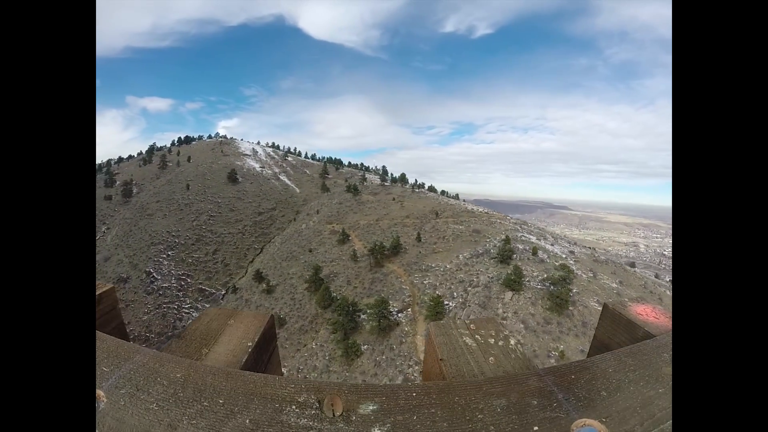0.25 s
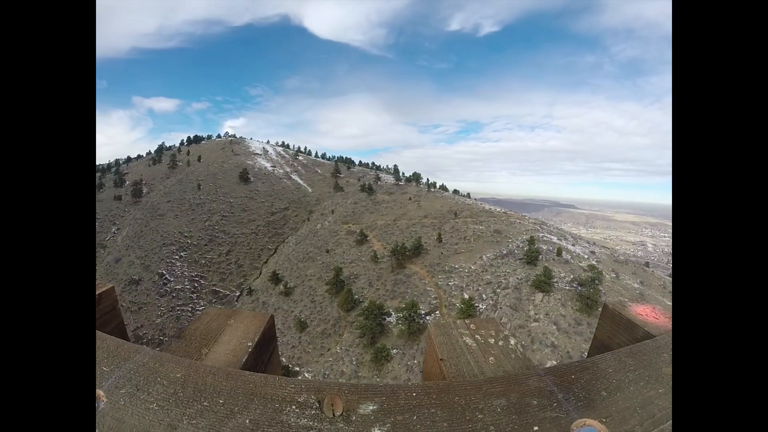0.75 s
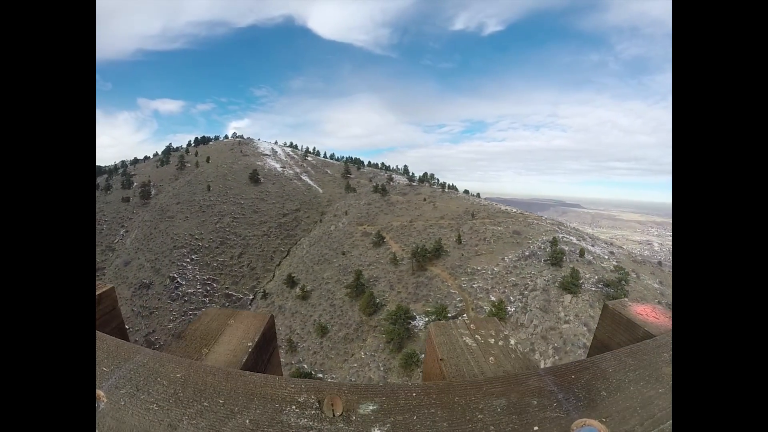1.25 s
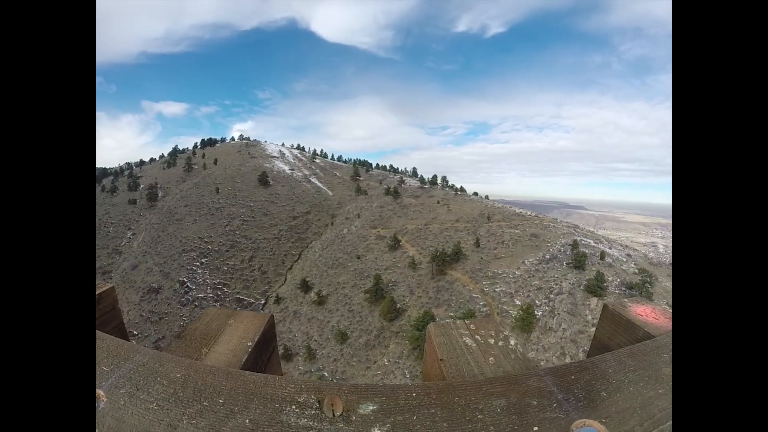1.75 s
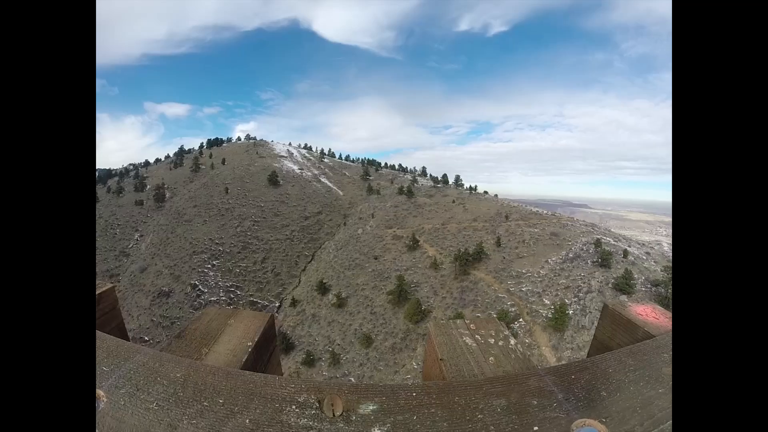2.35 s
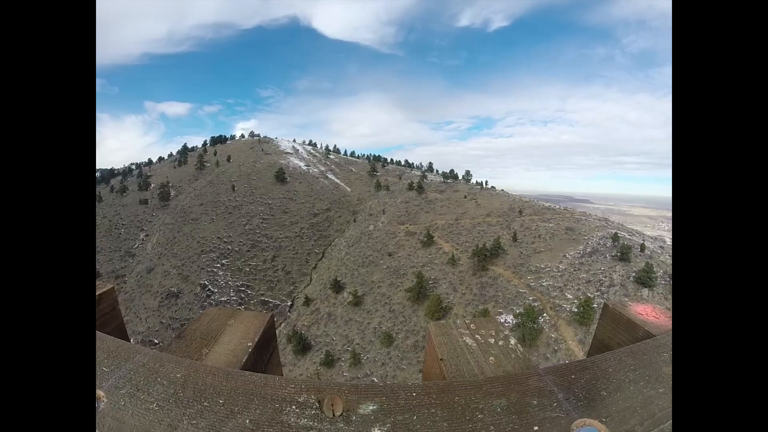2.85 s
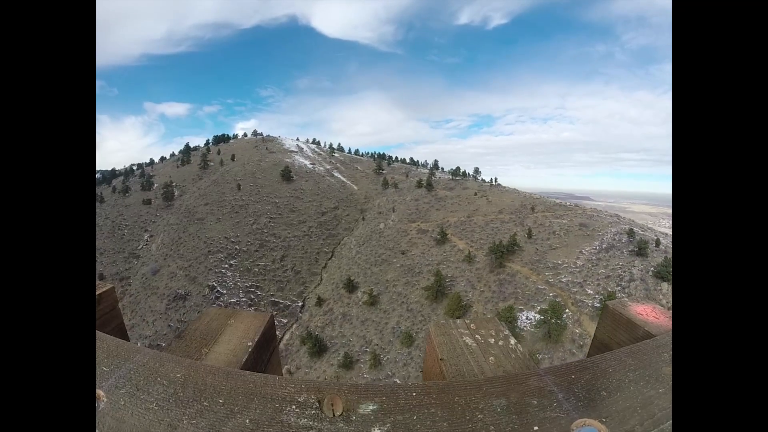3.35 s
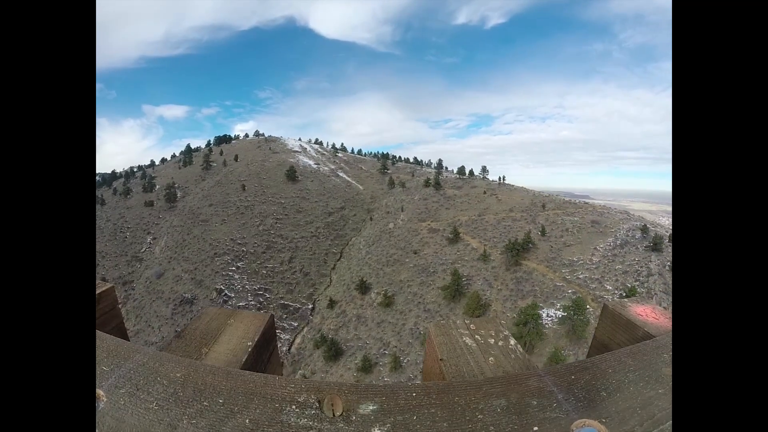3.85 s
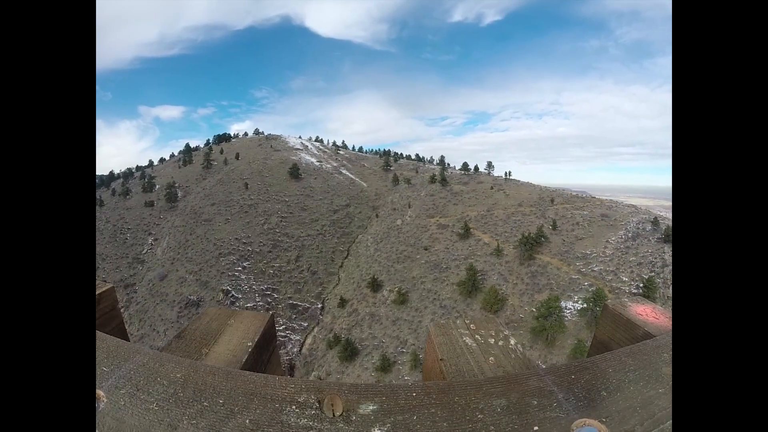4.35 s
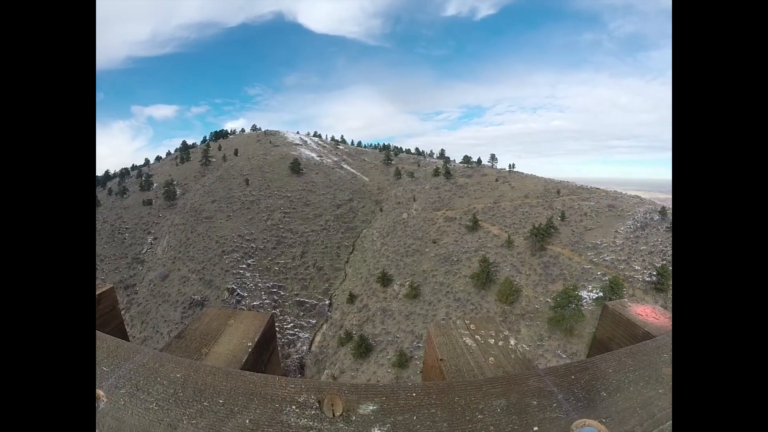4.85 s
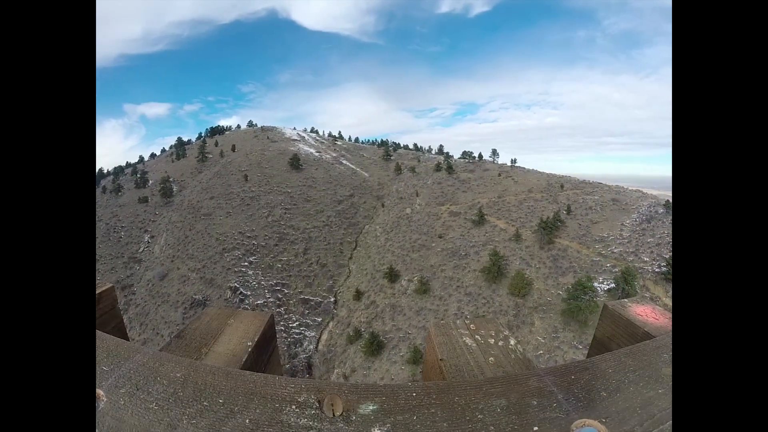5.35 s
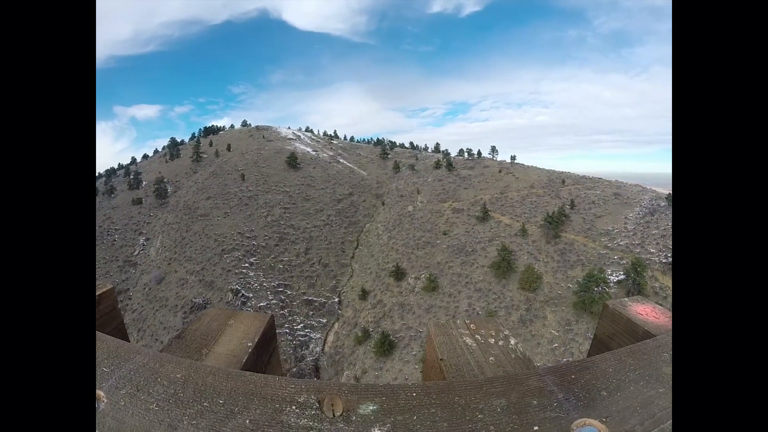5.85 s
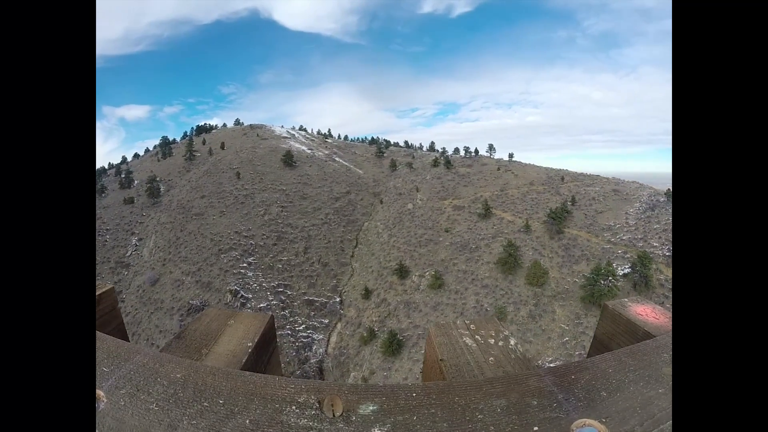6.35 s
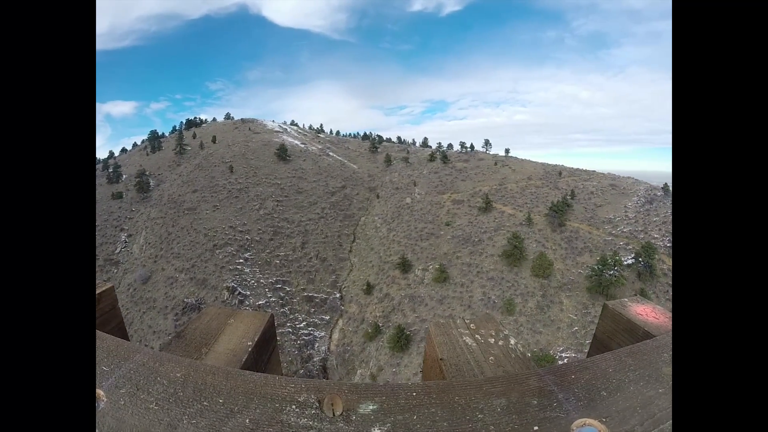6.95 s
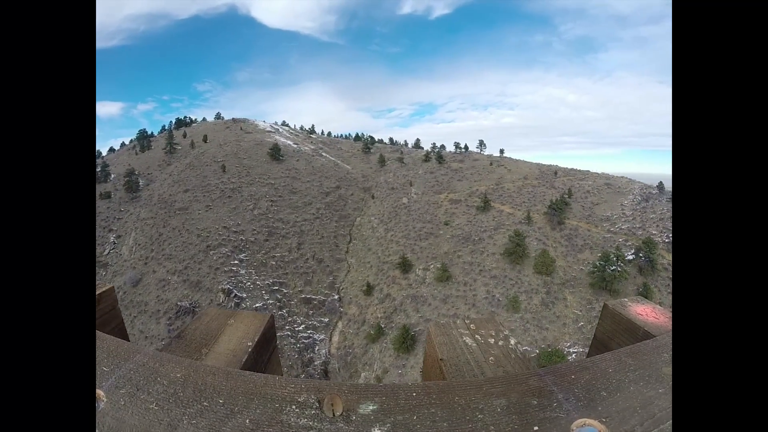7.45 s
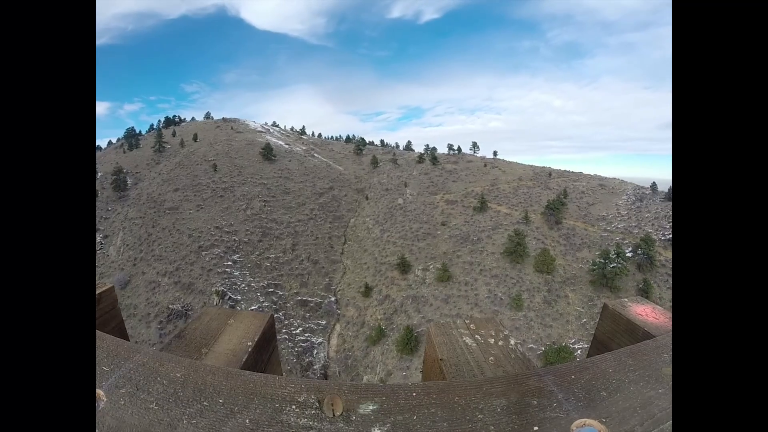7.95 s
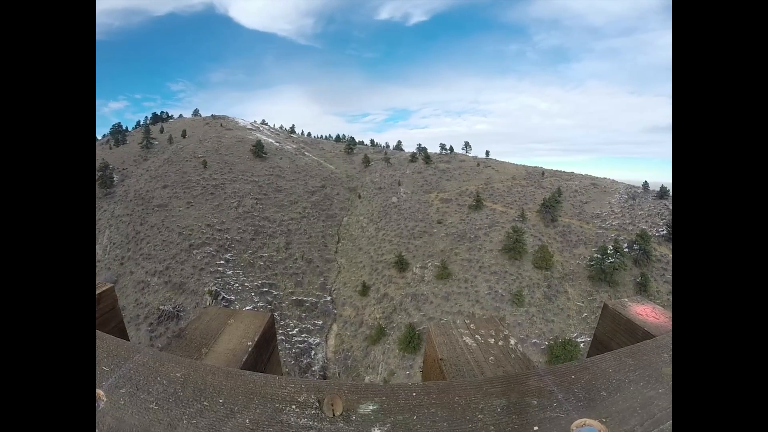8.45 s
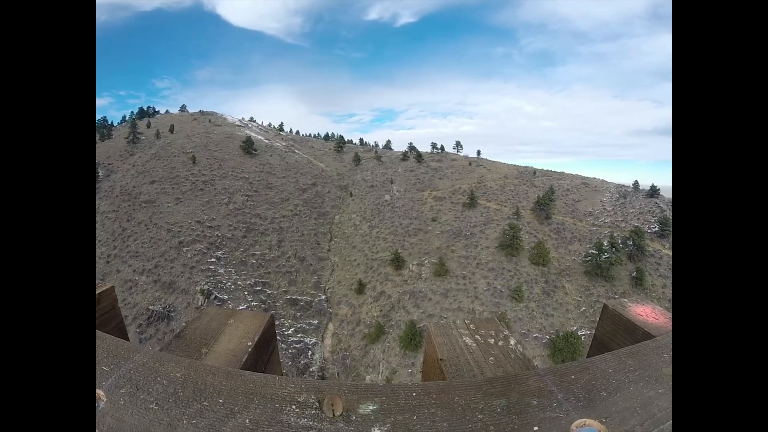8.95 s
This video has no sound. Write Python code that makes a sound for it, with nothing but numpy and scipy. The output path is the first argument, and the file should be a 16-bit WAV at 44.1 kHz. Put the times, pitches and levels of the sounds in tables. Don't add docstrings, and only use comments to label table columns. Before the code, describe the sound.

From right under a flying helicopter: rapid airy chopping, ringing hiss, deep wind rumble, and bursts of hard clattering that later thin to ticks.

```python
import sys
import numpy as np
from scipy import signal
from scipy.fft import rfft, irfft, next_fast_len
from scipy.io import wavfile
from scipy.ndimage import uniform_filter1d

SR = 44100
rng = np.random.default_rng(int(sys.argv[2]) if len(sys.argv) > 2 else 0)


def invert_db(x):
    u = np.asarray(x, float) / 20
    return 10 ** u


def dump(signal):
    limited = np.clip(np.atleast_2d(signal).T, -1, 1)
    pcm = np.round(limited * 32767).astype(np.int16)
    wavfile.write(sys.argv[1], SR, pcm)


N = 406161

BLADE_PASS_HZ = 10.75
# time_s, blade_lead_turns, puff_db, hiss_db
ROTOR = [(0, -0.33, -37, -34.5), (.6, -0.41, -36.5, -34.5), (1.1, -0.31, -33.5, -34.5),
         (1.6, -0.29, -35.5, -35.5), (2.6, -0.3, -33, -36.5), (3.6, -0.22, -34, -35),
         (4.1, -0.26, -35, -37), (4.6, -0.24, -38.5, -34.5), (5.1, -0.24, -34, -36),
         (5.6, -0.44, -32.5, -37.5), (6.6, -0.46, -36, -35.5), (7.1, -0.47, -34.5, -36.5),
         (7.6, -0.34, -31.5, -36.5), (8.1, -0.52, -34, -37.5), (8.6, -0.49, -35, -35.5),
         (9.21, -0.5, -32.5, -36.5)]
# start_s, peak_db
SLAPS = [(0.141, -20), (0.199, -20), (2.54, -22), (3.913, -17), (4.442, -19), (4.486, -29), (4.563, -17),
         (4.642, -19), (4.842, -25), (4.91, -25), (5.016, -28), (5.407, -22), (5.503, -16), (5.686, -14.5),
         (6.049, -15.5), (6.157, -23), (7.368, -21.5), (7.823, -20.5), (7.854, -44.5), (7.93, -22),
         (8.115, -15), (8.208, -18.5), (8.3, -17), (8.704, -17.5), (8.77, -16.5)]
# centre_hz, width_hz, level_db
CASE_RESONANCES = [(202.4, 46, 1), (322, 480, -9.5), (475, 26, -11), (786, 180, -6), (1062, 120, -13),
                   (1570, 117, 1), (2152, 175, -1), (2754, 220, -9.5), (3360, 220, -26.5),
                   (3400, 430, -20.5), (4283, 175, -17.5), (4950, 260, -21), (5600, 400, -25.5),
                   (6190, 470, -26.5), (6910, 120, -23.5), (7450, 190, -26), (8170, 170, -25.5),
                   (8865, 135, -23), (9700, 230, -28), (10350, 170, -26.5), (11380, 500, -36),
                   (12700, 640, -39.5), (15300, 1400, -37)]
# time_s, level_db
LOW_COUPLING = [
    (0, 3),
    (1.5, -3.5),
    (3, -5),
    (4, 0.5),
    (5, 1),
    (6.5, 4.5),
    (7.5, 2),
    (8.5, 3.5),
    (9.21, 1.5),
]
# pitch_hz, level_db (relative)
WHINE = [
    (3163, -64),
    (4357, -71),
    (1072, -65),
]


def rotor_and_turbine():
    lead, puff_db, hiss_db = in_time(ROTOR)
    turn = (BLADE_PASS_HZ * np.arange(N) / SR + lead + 0.014 * drift(1.7) + 0.23) % 1
    gate = np.clip(turn / 0.13, 0, 1) * np.exp(-(turn / 0.55) ** 5)
    eddies = invert_db(5.8 * np.tanh(0.8 * drift(110)))
    eddies = eddies / np.sqrt(uniform_filter1d(eddies ** 2, size=SR // 20))

    start_s, peak_db = np.transpose(SLAPS)
    slaps = bursts(start_s, peak_db - 4.5, np.full(len(start_s), 0.004), rise_s=0.00095)
    air = rng.standard_normal(N) + 0.3 * grains(900, spread_db=2.5)
    puffs = (invert_db(puff_db + 2.5) * gate * eddies + slaps) * air
    cracks = np.round((start_s + 0.001) * SR).astype(int)
    puffs[cracks] += invert_db(peak_db + 11.0)

    hiss = invert_db(2.3 * np.tanh(drift(69))) * rng.standard_normal(N)
    hiss = signal.sosfilt(signal.butter(1, 300, "high", fs=SR, output="sos"), hiss)

    dull = signal.butter(2, 3500, fs=SR, output="sos")
    scale = np.std(through(signal.sosfilt(dull, air), CASE_RESONANCES))
    drive = signal.sosfilt(dull, puffs) + invert_db(hiss_db + 1.0) * hiss
    deep = signal.sosfilt(signal.butter(1, 420, fs=SR, output="sos"), drive)
    low_coupling = invert_db(in_time(LOW_COUPLING)[0])
    sound = through(drive + (low_coupling - 1) * deep, CASE_RESONANCES) / scale

    for pitch_hz, level_db in WHINE:
        strength = invert_db(level_db + 6.0 + 3.4 * drift(7.2))
        phase = 2 * np.pi * np.cumsum(pitch_hz + 2.59 * drift(6.1)) / SR
        sound = sound + strength * np.sin(phase)
    return sound


# centre_hz, width_hz, level_db
LOOSE_PART = [(1470, 110, -3), (2306, 380, 2), (2454, 444, 1.5), (3626, 200, -9.5), (4400, 380, -17),
              (5330, 167, -10), (5790, 245, -9), (6350, 460, -12.5), (7200, 430, -23), (8800, 990, -28),
              (12600, 900, -41)]


def rattle():
    start_s, peak_db, length_s, dull_db = contacts()
    chatter = chatter_level() * invert_db(4.5 + 7.0 * np.tanh(drift(96)))
    thuds = evened(grains(9000, spread_db=3.5), span_s=0.012)
    ticks = evened(grains(900, spread_db=2.5) + 0.6 * thuds, span_s=0.012)
    scale = np.std(through(thuds, LOOSE_PART))

    dull_knocks = bursts(start_s, peak_db + dull_db + 3.0, length_s * 0.65, rise_s=0.0061)
    bright_knocks = bursts(start_s + 0.004, peak_db - 1.0, length_s * 0.4, rise_s=0.002)
    dull = (dull_knocks + chatter) * thuds
    bright = (invert_db(5.5) * bright_knocks + chatter) * ticks
    low_and_top = LOOSE_PART[:5] + LOOSE_PART[9:]
    return (through(dull, low_and_top) + through(bright, LOOSE_PART[5:9])) / scale


# start_s, peak_db, bounces (rounded; below -0.5 the knock is silent), dull_share_db
KNOCKS = [(4.313, -19, 0.5, -2), (4.365, -29, 1.5, 2.5), (4.48, -15.5, 1, 3), (4.533, -27, 1.5, -8),
          (4.59, -12, 0.5, -2), (4.638, -16, 2, 4), (4.735, -13, 2, -5), (4.841, -13, -1, 7.5),
          (4.912, -18, 1.5, -1), (5.013, -16.5, 0.5, -0.5), (5.097, -24, 2, 2), (5.439, -24.5, 0, 8),
          (5.474, -19, 3, -4), (5.608, -19.5, 1, 4), (5.682, -18, 0.5, -7), (5.731, -17.5, 2, -8),
          (5.825, -14.5, 1, -2), (5.87, -13.5, 1.5, -9), (5.932, -15, 0.5, -8.5), (5.9813, -15, 0.5, -3),
          (6.0614, -6, -1.5, -2), (6.111, -18, 0.5, 7), (6.2197, -40, 3, 8.5), (6.549, -24, 1.5, -2.5),
          (6.6253, -27, 1.5, 5), (6.701, -19, 1.5, -1.5), (6.77, -15, -1, -7), (6.812, -19.5, 2, 0),
          (6.933, -16.5, -0.5, 6), (6.982, -24, 0.5, 0)]
# start_s, peak_db
TICKS = [(2.507, -23.5), (2.681, -35), (3.59, -30), (3.96, -32), (4.182, -28), (6.145, -29), (6.437, -26),
         (7.086, -29), (7.204, -29), (7.225, -18), (7.2803, -24), (7.344, -27), (7.4674, -39), (7.832, -34),
         (8.7714, -38), (8.868, -26), (8.935, -28), (9.104, -29), (9.174, -33)]
TICK_DULL_DB, BOUNCE_S = 2, 0.0292
KNOCK_S, HARD_SHORTENS = 0.011, 0.19


def contacts():
    rows = []
    for start_s, peak_db, bounces, dull_db in KNOCKS:
        luck_s = 0.0019 * rng.standard_normal()
        for k in range(round(bounces) + 1):
            rows.append((start_s + k * BOUNCE_S + luck_s * (k > 0), peak_db, dull_db))
    for start_s, peak_db in TICKS:
        rows.append((start_s, peak_db, TICK_DULL_DB))
    start_s, peak_db, dull_db = np.transpose(rows)
    return start_s, peak_db, KNOCK_S * invert_db(-HARD_SHORTENS * (peak_db + 21)), dull_db


# start_s, length_s, level_db
SPELLS = [(0, 4.2, -55.5), (4.327, 0.047, -49), (4.48, .05, -50), (4.63, 0.05, -45.5), (4.731, .22, -37.5),
          (5.006, 0.041, -37.5), (5.086, 0.058, -39), (5.193, 0.049, -47), (5.478, 0.098, -38.5),
          (5.693, 0.058, -36.5), (5.833, 0.14, -40), (6.046, 0.02, -35.5), (6.154, 0.16, -39.5),
          (6.359, 0.02, -36), (6.435, 0.17, -54), (6.74, 0.277, -42), (7.095, .24, -45.5),
          (7.459, 0.16, -46.5), (8.781, 0.16, -45), (8.973, 0.18, -52)]
CHATTER_REST_DB, SPELL_ATTACK_S, SPELL_RELEASE_S = -62, 0.02, 0.048


def chatter_level():
    t = np.arange(N) / SR
    spells = np.zeros(N)
    for start_s, length_s, level_db in SPELLS:
        end_s = start_s + length_s
        corners_s = [start_s - SPELL_ATTACK_S, start_s, end_s, end_s + SPELL_RELEASE_S]
        spells += invert_db(level_db) * np.interp(t, corners_s, [0, 1, 1, 0])
    return invert_db(CHATTER_REST_DB) + spells * invert_db(1.1 * np.tanh(drift(36)))


LOW_MODE_HZ, MIDDLE_MODE_HZ, UPPER_MODE_HZ = 110.5, 143.7, 177.9
LOW_REST_DB, MIDDLE_REST_DB, UPPER_REST_DB = -42.5, -39.5, -42
LOCK_DB, LOCK_ENDS_S, LOCK_FADE_DB_PER_S = -28, 1.199, 19
# time_s, half_length_s, low_mode_db, middle_mode_db
BUFFETS = [(0, 0.054, -30, -27.5), (.3, 0.22, -31.5, -30.5), (1.384, 0.078, -41, -24),
           (1.565, 0.15, -30, -29), (1.813, 0.077, -46, -21), (2.013, 0.086, -31.5, -41),
           (2.362, 0.052, -31, -32), (2.683, 0.093, -35, -29.5), (3.003, 0.095, -33, -27.5),
           (3.21, 0.031, -24.5, -25.5), (3.356, 0.033, -24, -25), (3.56, .06, -29.5, -29.5),
           (3.894, 0.057, -26, -26.5), (4.16, 0.1, -45, -29.5), (4.285, 0.019, -17, -33),
           (4.395, 0.032, -35, -26), (4.51, 0.045, -22.5, -23), (4.638, 0.12, -29, -21),
           (4.814, 0.037, -20, -23.5), (4.992, .09, -35, -20.5), (5.26, 0.068, -44, -21),
           (5.61, 0.14, -32, -26.5), (5.716, 0.024, -27.5, -32), (5.875, 0.046, -26, -21),
           (6.054, 0.049, -28, -28), (6.28, 0.039, -23, -28.5), (6.447, 0.088, -30, -26.5),
           (6.724, 0.081, -32, -32), (8.408, 0.028, -43, -27), (9.004, 0.029, -34, -40)]
# time_s, half_length_s, level_db
UPPER_BUFFETS = [(1.837, 0.074, -33), (2.07, 0.074, -33.5), (2.466, 0.057, -34.5), (3.492, 0.019, -35),
                 (3.85, .04, -36.5), (4.227, 0.047, -30.5), (4.368, 0.034, -29), (4.52, 0.05, -33),
                 (4.859, .18, -30), (5.387, 0.124, -30.5), (5.72, 0.048, -32), (6.272, 0.033, -28.5),
                 (6.721, 0.046, -33.5), (6.92, 0.049, -31.5), (7.44, 0.16, -35), (8.28, .1, -37),
                 (9.005, 0.047, -35.5)]


def mount():
    time_s, half_s, low_peak_db, middle_peak_db = np.transpose(BUFFETS)
    low_db = shaken_db(LOW_REST_DB, time_s, half_s, low_peak_db)
    middle_db = shaken_db(MIDDLE_REST_DB, time_s, half_s, middle_peak_db)
    lock_db = LOCK_DB - LOCK_FADE_DB_PER_S * np.maximum(np.arange(N) / SR - LOCK_ENDS_S, 0)
    upper_db = np.maximum(lock_db, shaken_db(UPPER_REST_DB, *np.transpose(UPPER_BUFFETS)))
    unlocked = np.clip(uniform_filter1d(-30 - upper_db, size=SR // 2) / 8, 0, 1)

    low = shaken_mode(LOW_MODE_HZ, low_db - 2.5, wander_hz=7.0, flutter_db=2.51)
    middle = shaken_mode(MIDDLE_MODE_HZ, middle_db - 0.6, wander_hz=4.5, flutter_db=1.78)
    upper = shaken_mode(UPPER_MODE_HZ, upper_db - 0.6, wander_hz=2 + 10 * unlocked, flutter_db=2.0)
    overtone = rms_one(through(rng.standard_normal(N), [(510, 30, 0)]))
    return low + middle + upper + (1 - unlocked) * invert_db(upper_db - 19.5) * overtone


def shaken_db(rest_db, times_s, halves_s, peaks_db):
    t = np.arange(0, N, 40) / SR
    swells = np.zeros(len(t))
    for time_s, half_s, peak_db in zip(times_s, halves_s, peaks_db):
        swells += invert_db(2 * peak_db) * np.exp(-((t - time_s) / half_s) ** 2)
    rest = invert_db(2 * (rest_db + 0.56 * gust_swing()))
    return 10 * np.log10(rest + np.interp(np.arange(N) / SR, t, swells))


def shaken_mode(hz, level_db, wander_hz, flutter_db):
    phase = 2 * np.pi * np.cumsum(hz + wander_hz * drift(11.49)) / SR
    return np.sqrt(2) * invert_db(level_db + flutter_db * drift(22.3)) * np.sin(phase)


SWAY_DB, SWAY_FOLLOWS, RUMBLE_DB, RUMBLE_FOLLOWS = -34, 1.23, -32, 0.9
# frequency_hz, level_db (per Hz)
RUMBLE = [
    (15, -17),
    (25, -13),
    (65, -3),
    (145, -4.5),
    (165, -4),
    (264, -21),
    (320, -24),
    (420, -53.5),
    (700, -120),
]
# time_s, strength_db, roughness_db
GUST = [(0, -38, -2), (1.0, -36.5, 0), (1.4, -37.5, 4.5), (2.0, -33, -1.5), (2.5, -33.5, 0.5),
        (2.8, -35, 0.5), (3.2, -32.5, -0.5), (3.85, -30.5, 1.5), (4.3, -28.5, -1), (5.1, -29, 1),
        (5.25, -35.5, 0.5), (5.8, -29.5, 1), (6.45, -29, -2.5), (7.1, -31, -1), (7.55, -34, 0),
        (8.3, -39, -0.5), (8.85, -36, 1), (9.21, -34, 2)]


def wind():
    sway_db = SWAY_DB + SWAY_FOLLOWS * gust_swing()
    rumble_db = RUMBLE_DB + RUMBLE_FOLLOWS * gust_swing()
    sway = shaken_mode(19, sway_db - 0.7, wander_hz=4.04, flutter_db=2.5)
    hz, db = np.transpose(RUMBLE)
    lumps = invert_db(0.37 * drift(14)) * rng.standard_normal(N)
    rumble = causal_filter(lumps, lambda at: invert_db(np.interp(np.log(at), np.log(hz), db)))
    roughness_db = in_time(GUST)[1]
    return sway + invert_db(rumble_db + roughness_db) * rms_one(rumble)


def gust_swing():
    gust_db = in_time(GUST)[0]
    return gust_db - gust_db.mean()


def bursts(times_s, peaks_db, lengths_s, rise_s):
    out, t = np.zeros(N), np.arange(SR // 8) / SR
    for start_s, peak_db, length_s in zip(times_s, peaks_db, lengths_s):
        i = round(start_s * SR)
        shape = np.exp(-t / max(length_s, 0.002)) * (1 - np.exp(-t / rise_s)) ** 2
        out[i:i + len(t)] += (invert_db(peak_db) * shape)[:N - i]
    return out


def grains(per_s, spread_db):
    sizes = invert_db(spread_db * np.minimum(rng.exponential(1, N), 5)) * rng.choice([-1, 1], N)
    return rms_one(sizes * (rng.random(N) < per_s / SR))


def evened(x, span_s):
    return x / np.sqrt(uniform_filter1d(x ** 2, size=int(span_s * SR)) + 0.05)


def through(x, body):
    def gain_at(hz):
        power = 0
        for centre_hz, width_hz, level_db in body:
            power = power + invert_db(2 * level_db) / (1 + ((hz - centre_hz) / width_hz) ** 2) ** 2
        return np.sqrt(power)
    return causal_filter(x, gain_at)


def causal_filter(x, gain_at):
    size = next_fast_len(N + SR)
    hz = np.arange(size // 2 + 1) * SR / size + 1
    cepstrum = irfft(np.log(gain_at(hz) + 1e-7), size)
    cepstrum[1:size // 2] *= 2
    cepstrum[size // 2 + 1:] = 0
    return irfft(rfft(x, size) * np.exp(rfft(cepstrum)), size)[:N]


def drift(rate_hz):
    r = np.exp(-2 * np.pi * rate_hz / SR)
    return rms_one(signal.lfilter([1], [1, -2 * r, r * r], rng.standard_normal(N + SR))[SR:])


def rms_one(x):
    return x / np.sqrt(np.mean(x ** 2) + 1e-20)


def in_time(rows):
    time_s, *columns = np.transpose(rows)
    return [np.interp(np.arange(N) / SR, time_s, column) for column in columns]


def scene():
    return (rotor_and_turbine() + rattle() + mount() + wind())[None]


def band_limit(x):
    return signal.sosfilt(signal.butter(12, 15390, fs=SR, output="sos"), x)


def record(dry):
    cut = signal.sosfilt(signal.cheby2(10, 40, 15350, fs=SR, output="sos"), dry)
    fade = np.clip((N - np.arange(N)) / (0.004 * SR), 0, 1)
    return band_limit(cut * fade)


dry = scene()
out = record(dry)
dump(out)
```